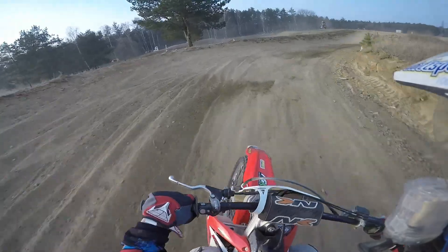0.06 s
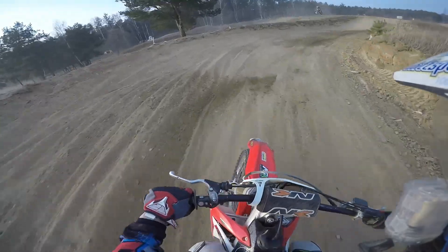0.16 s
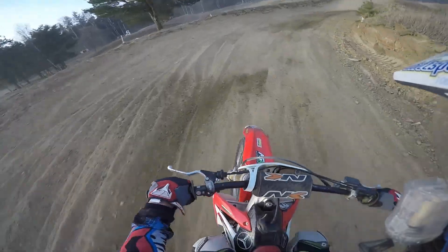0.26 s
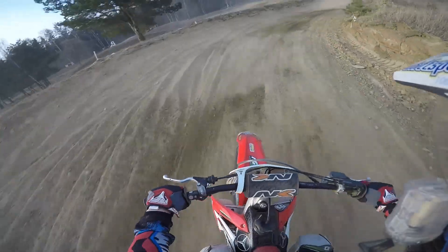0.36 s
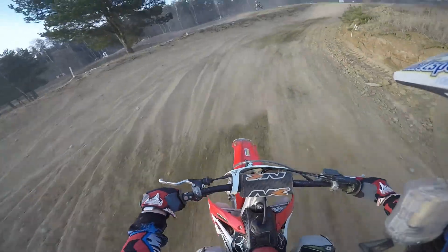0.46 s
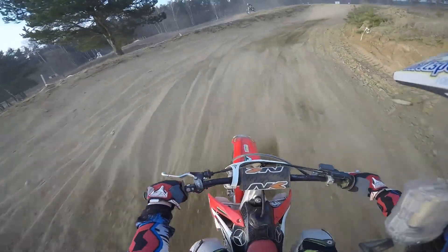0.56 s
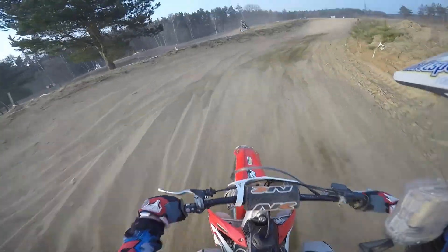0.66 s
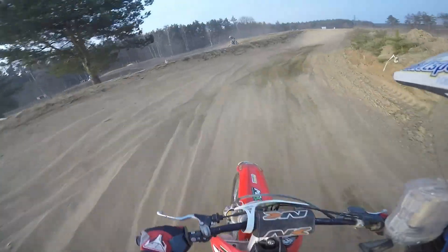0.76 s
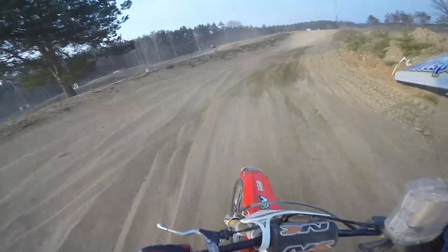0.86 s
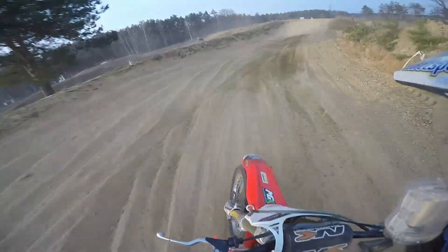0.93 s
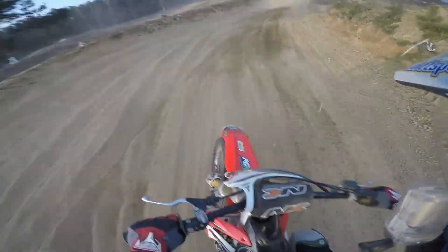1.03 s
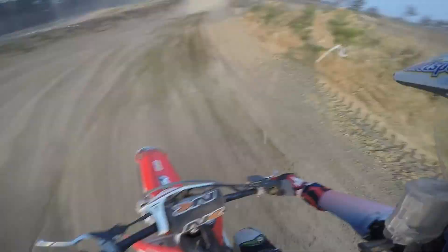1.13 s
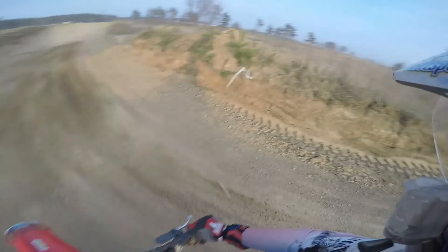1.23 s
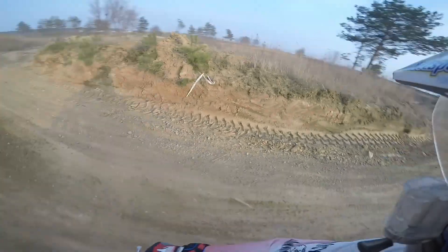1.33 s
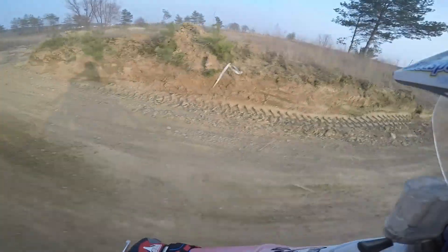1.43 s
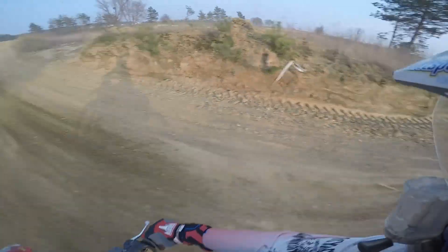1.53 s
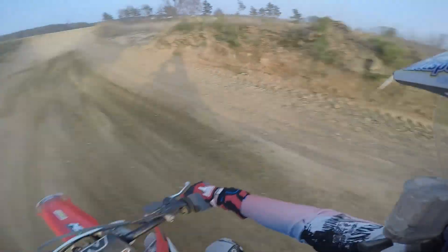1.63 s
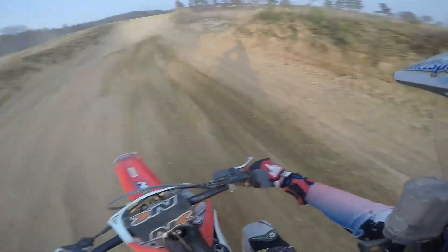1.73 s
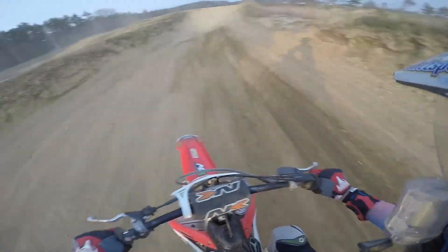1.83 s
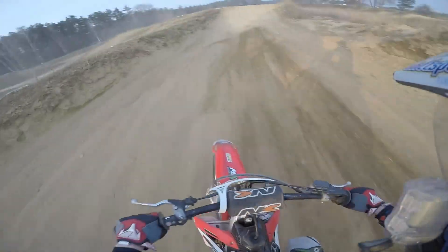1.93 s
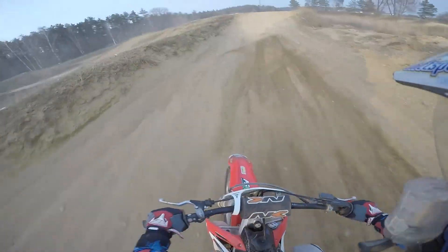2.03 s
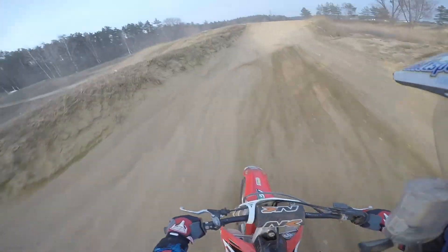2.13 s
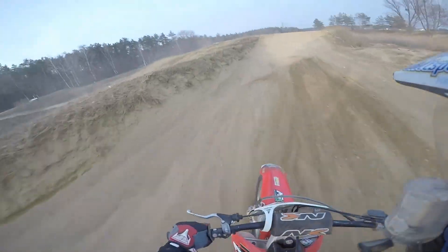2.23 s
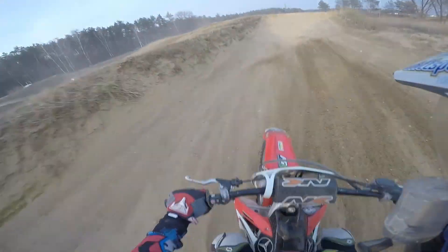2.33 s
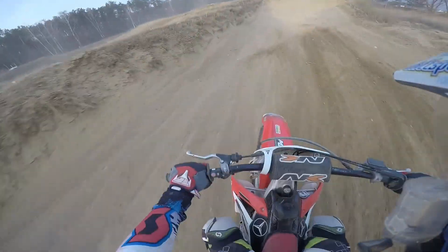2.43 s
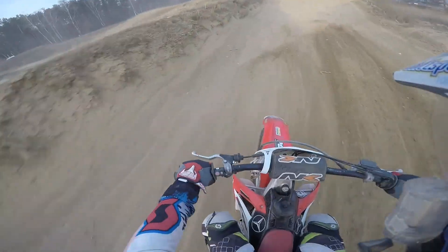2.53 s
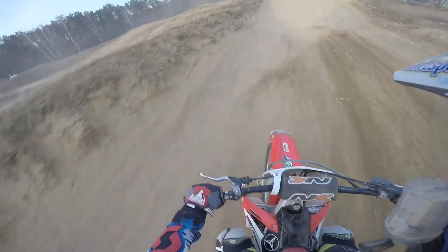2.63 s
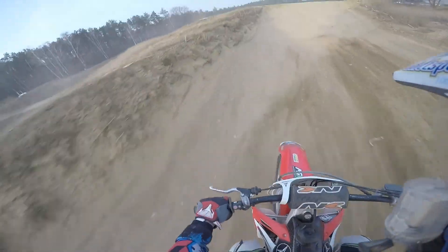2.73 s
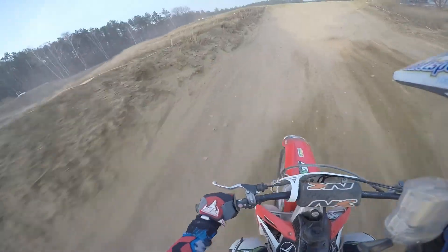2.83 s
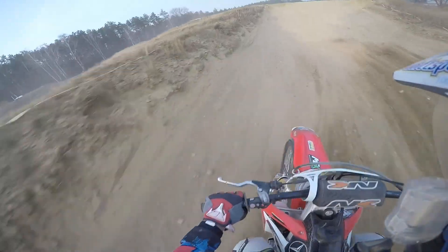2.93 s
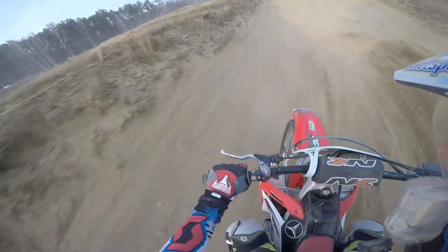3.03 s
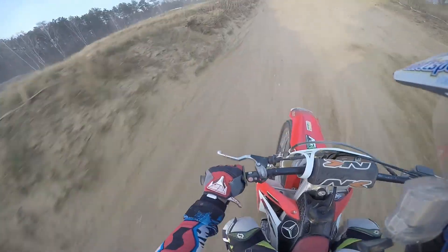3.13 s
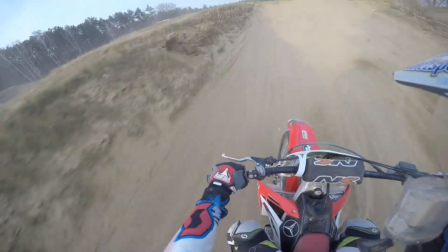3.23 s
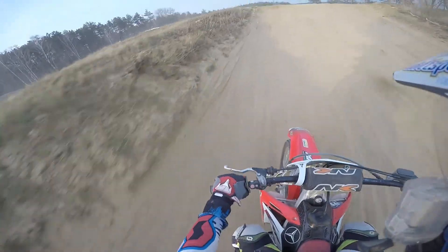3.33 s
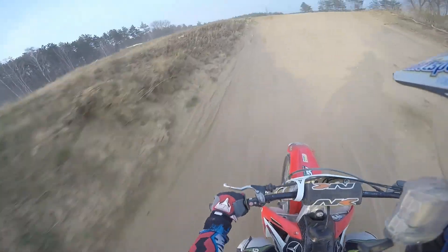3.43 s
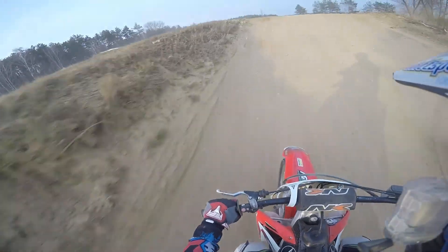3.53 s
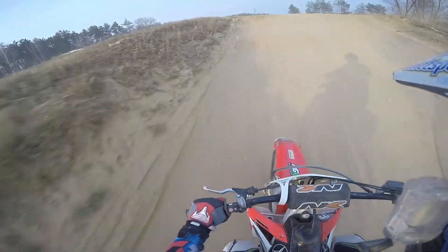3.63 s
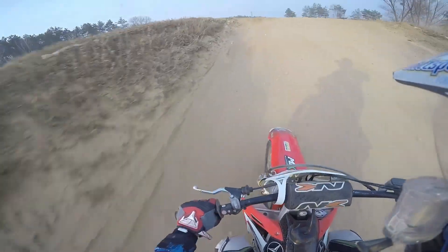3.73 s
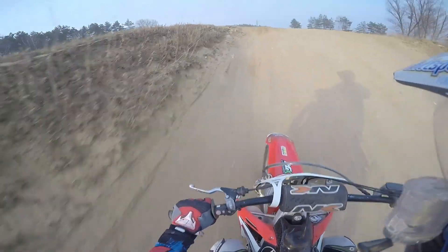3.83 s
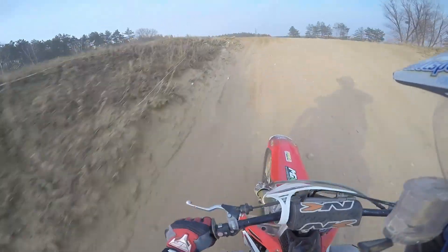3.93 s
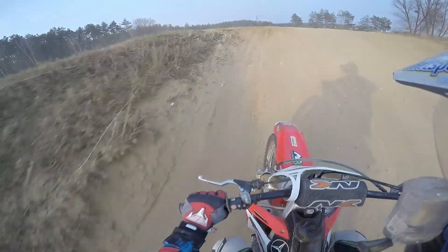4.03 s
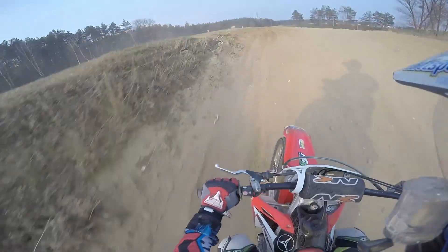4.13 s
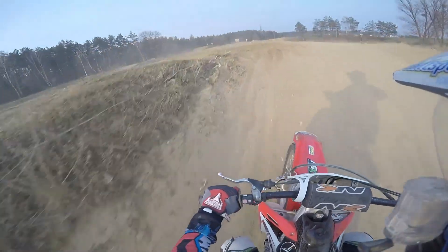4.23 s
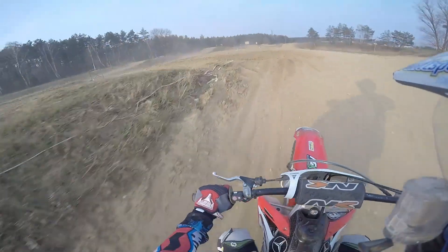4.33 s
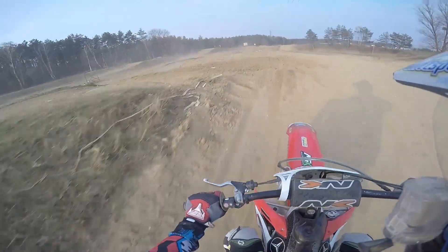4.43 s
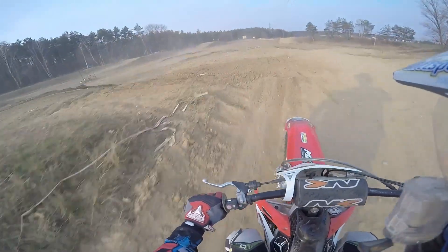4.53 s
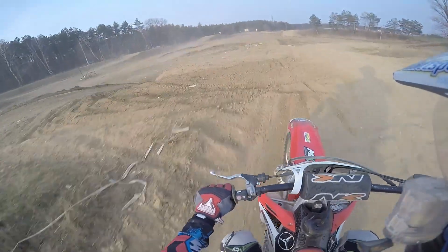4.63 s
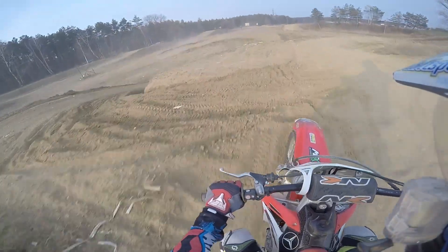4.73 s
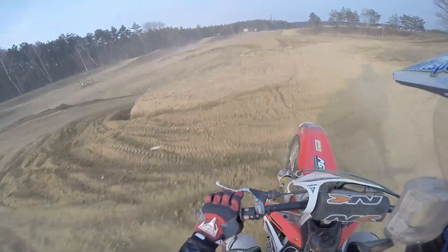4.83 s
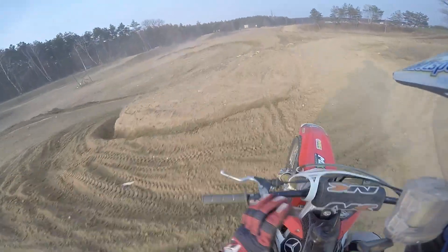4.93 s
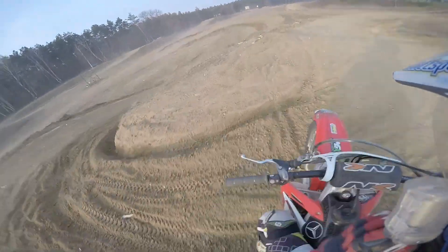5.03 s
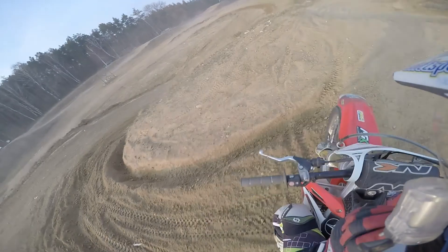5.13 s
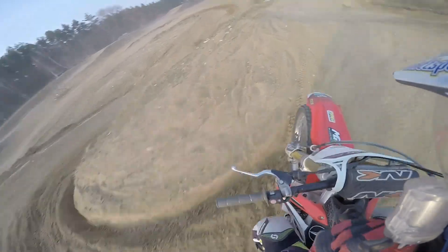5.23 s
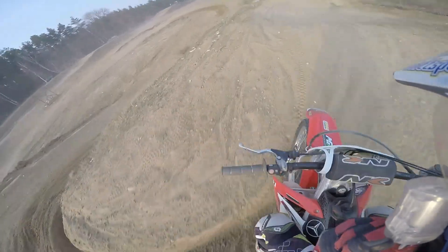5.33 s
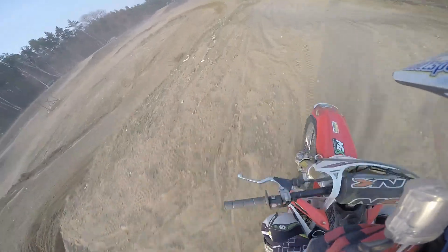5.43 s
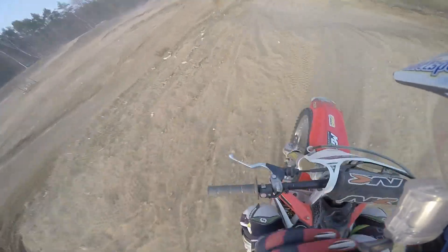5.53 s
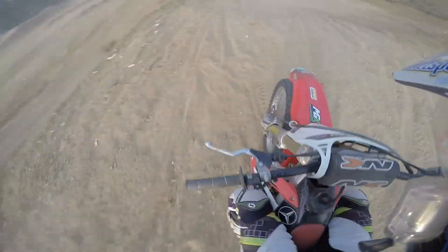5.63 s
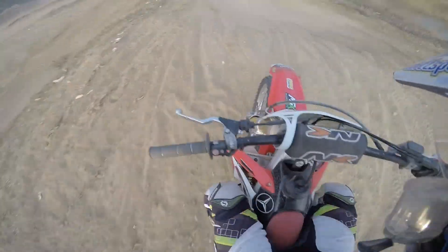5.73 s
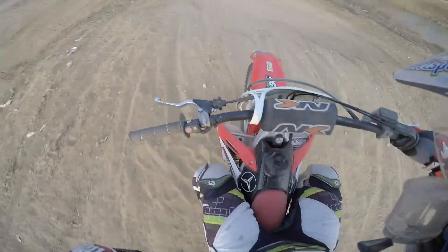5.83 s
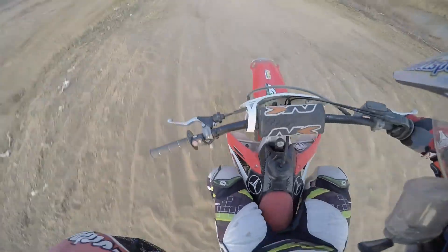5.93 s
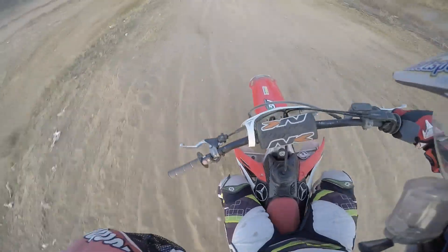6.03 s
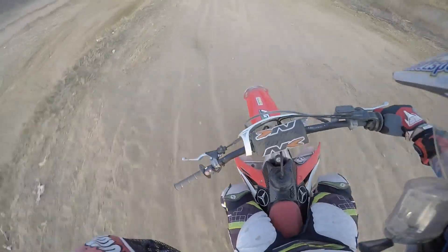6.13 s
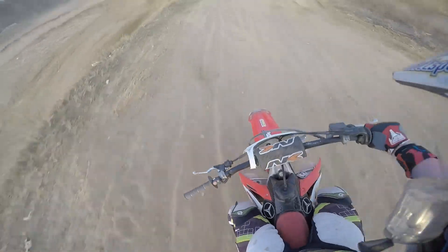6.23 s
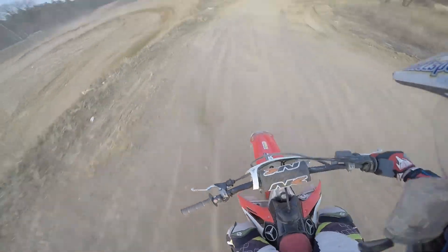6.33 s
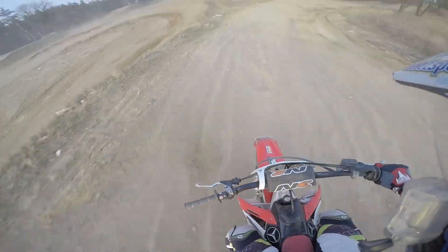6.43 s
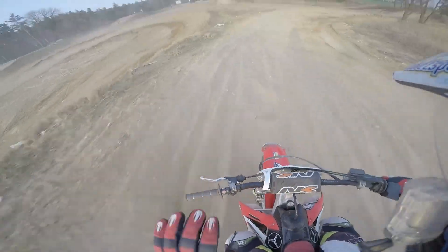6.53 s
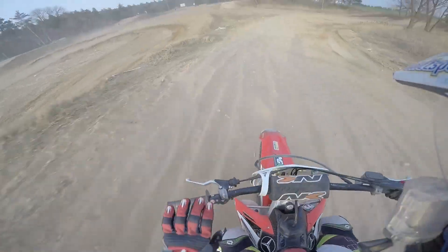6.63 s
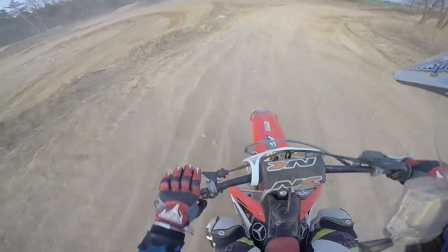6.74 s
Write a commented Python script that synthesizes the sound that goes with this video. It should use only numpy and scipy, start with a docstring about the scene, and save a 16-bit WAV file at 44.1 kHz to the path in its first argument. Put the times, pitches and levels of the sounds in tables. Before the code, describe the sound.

A single-cylinder four-stroke dirt bike runs at low revs on an outdoor dirt track, heard from the rider's helmet. The pipe throbs, gears and chain whirr, valves tick and tyres scrub softly. A strong, barking throttle blip comes at 0.1 s, then more at about 0.4, 0.8, 1.3, 1.5, 1.9 and 2.2 s, each rising quickly and sagging. Deep wind flutter swells around 1 s. Blips continue from 2.6 to 4.6 s, with dry chain slaps, the clearest near 2.5 and 3.95 s, and a buffet at 4.1 s. Revs then fall lower; the brake moans faintly at 4.8 s and chirps very high at 5.1 s, with a low thud at 5.2 s. Around 5.7 s three rapid, hard plastic clacks overload the microphone and leave a low hum. The engine sinks almost away, then partly returns from 6.05 s, blipping at 6.3 and 6.5 s.

```python
"""The throb and whirr of a dirt bike at low revs, heard from the rider's helmet, and soon the first of many blips.
The single-cylinder four-stroke sounds at each firing: a pipe puff, an airbox honk and a rasping burst of gas.
Filtered noise makes the whirr of gears and chain, the scrub of the tyres and the wind that rocks the helmet.
Damped modes make the chain slaps, the jolted camera mount and hard knocks on the camera that overload its microphone.
The brake moans on a wavering tone and squeaks in short chirps."""
import sys
import numpy as np
from scipy import signal
from scipy.fft import rfft, irfft, next_fast_len
from scipy.io import wavfile
from scipy.ndimage import uniform_filter1d, map_coordinates

SR = 44100
rng = np.random.default_rng(int(sys.argv[2]) if len(sys.argv) > 2 else 0)


def wav_record(signal):
    """Record a signal, one row per channel, as 16-bit PCM in the file named by sys.argv[1]."""
    frames = np.transpose(np.atleast_2d(signal))
    bounded = np.clip(frames, -1, 1)
    # unit amplitude maps onto the largest positive 16-bit level
    quanta = np.round(bounded * 32767).astype(np.int16)
    wavfile.write(sys.argv[1], SR, quanta)


N = 298557


def amp(db):
    """Decibels to gain."""
    return 10 ** (np.asarray(db) / 20)


def unit(x):
    """Scaled to rms 1."""
    return x / np.sqrt(np.mean(x ** 2, axis=-1, keepdims=True) + 1e-20)


def clock(length):
    """Sample times over a length in seconds."""
    return np.arange(round(length * SR)) / SR


def curves(rows, times):
    """Each column of a table, read at the given times."""
    s, *cols = np.transpose(rows)
    return [np.interp(times, s, c) for c in cols]


def wobble(rate):
    """A smooth random curve, rate knots a second."""
    return map_coordinates(rng.standard_normal(int(N * rate / SR) + 4), [np.arange(N) * rate / SR])


def colour(points):
    """The response through (Hz, dB) points on a log axis."""
    hz, db = np.transpose(points)
    return lambda f: amp(np.interp(np.log(f + 1), np.log(hz), db))


def resonator(peaks):
    """The causal response of (Hz, width, dB) resonances."""
    return lambda f: sum((-1) ** k * amp(db) * 1j * f * w / (c * c - f * f + 1j * f * w) for k, (c, w, db) in enumerate(peaks))


def filtered(x, response):
    """x through a response, scaled so that white noise keeps its power."""
    size = next_fast_len(N + SR // 2)
    gain = response(np.fft.rfftfreq(size, 1 / SR))
    return irfft(rfft(x, size) * gain / np.sqrt(np.mean(abs(gain) ** 2)), size)[:N]


def placed(times, sounds):
    """One row of sound starting at each time."""
    index = np.round(np.abs(times) * SR).astype(int)[:, None] + np.arange(sounds.shape[1])
    return np.bincount(index.ravel(), sounds.ravel(), N)[:N]


def ring(modes, t):
    """A sum of damped modes; neighbours swing in opposite directions."""
    return sum((-1) ** k * amp(db - 60 * t / t60) * np.sin(2 * np.pi * hz * t) for k, (hz, db, t60) in enumerate(modes))


def gas_bursts(times, levels_db, rise, life, tail_db, tail_life, scatter_db):
    """A burst of turbulence at each time: a head and a weaker tail."""
    t = clock(.04)
    shape = (1 - np.exp(-t / rise)) ** 2 * (np.exp(-t / life) + amp(tail_db) * np.exp(-t / tail_life))
    sizes = amp(levels_db + scatter_db * rng.standard_normal(len(times)))
    return placed(times, sizes[:, None] * unit(shape * rng.standard_normal((len(times), len(t)))))


def envelope(t, full, end, rise, fall):
    """Attack and decay: a linear rise to 1 by full, a hold until end, then exponential decay."""
    attack = np.clip((t - full) / rise + 1, 0, 1)
    decay = np.exp(-np.maximum(t - end, 0) / fall)
    return attack * decay


# Steady buffeting of the helmet: (time [s], relative level [dB])
BREEZE = [(0, -30), (4.7, -29), (5.0, -29.5), (5.9, -28), (6.12, -39.5), (6.77, -32)]
# Gusts and bumps: (time [s], held [s], relative level [dB])
GUSTS = [(0.78, 0.022, -24), (0.94, 0.067, -10.5), (1.14, 0.1, -20), (2.52, 0.02, -23), (3.72, 0.24, -23.5),
         (4.1, 0.022, -12.5), (4.22, 0.08, -20), (4.48, 0.015, -19.5), (5.171, 0.053, -10),
         (5.39, 0.19, -21)]
GUST_RISE_S, GUST_FALL_S = 0.055, 0.045


def buffeting(t):
    """Addition of power: gusts and bumps add to the breeze as incoherent sources; returns dB."""
    power = amp(curves(BREEZE, t)[0]) ** 2
    for s, held, db in GUSTS:
        gust = amp(db) * envelope(t, s, s + held, GUST_RISE_S, GUST_FALL_S)
        power = power + gust ** 2
    return 10 * np.log10(power)


# Spectrum of the deep flutter: (frequency [Hz], relative level [dB])
FLUTTER_SPECTRUM = [(10, -20), (20, -9.5), (27, 8.5), (34, -0.5), (44, -29), (70, -24), (120, -40),
                    (300, -50), (1000, -103)]


def wind(t, rush_db=-41):
    """Turbulent pressure: air and bumps rock the helmet with a deep flutter, over a low rush."""
    buffet_db = buffeting(t)
    flutter = filtered(rng.standard_normal(N), colour(FLUTTER_SPECTRUM))
    # dividing by the running rms over 0.1 s leaves the swells to the buffeting
    swell = np.sqrt(abs(uniform_filter1d(flutter ** 2, size=SR // 10)))
    rush_spectrum = colour([(25, -19), (55, -12.0), (95, -11), (170, -20.5), (400, -44), (1000, -70)])
    rush = filtered(rng.standard_normal(N), rush_spectrum)
    # the rush follows the buffeting only weakly
    rush_gain = amp(rush_db + 0.32 * (buffet_db + 34))
    return amp(buffet_db + 1.5) * flutter / swell + rush_gain * rush


# The engine and tyres drop from the first knock and partly recover: (time [s], gain [dB])
DIP = [(5.67, -0.5), (5.75, -15), (5.85, -20.5), (6.02, -20), (6.045, -12.5), (6.4, -8.5), (6.62, -3)]


def dip_db(t):
    """Attenuation: the gain in dB shared by engine and tyres."""
    return curves(DIP, t)[0]


def tyres(t, level_db=-49):
    """Rolling contact noise: knobbly tyres on packed dirt give a soft, uneven scrub."""
    spectrum = colour([(100, -12), (300, -3), (600, 0), (900, -5), (2000, -24), (6000, -50)])
    scrub = filtered(rng.standard_normal(N), spectrum)
    return amp(level_db + dip_db(t) + 1.5 * wobble(14)) * scrub


# Chain slapping its guide: (time [s], relative peak level [dB])
SLAPS = [(0.307, -22), (0.687, -19), (1.139, -22.5), (2.503, -18), (3.279, -21.5), (3.421, -23),
         (3.951, -16), (4.178, -21), (4.912, -31), (5.178, -24.5), (6.023, -37)]
# Damped modes of the guide: (frequency [Hz], relative level [dB], 60 dB decay time [s])
GUIDE_MODES = [(840, 5.5, 0.014), (1054, 10.5, 0.043), (1237, 7, 0.062), (1290, 1, 0.034), (1600, 4, 0.064),
               (2470, -3, 0.06)]


def chain():
    """Impact excitation: the slack chain rattles on its guide, whose modes ring to the noise of the links."""
    t = clock(.06)
    links = amp(-60 * t / 0.032) * rng.standard_normal((len(SLAPS), len(t)))
    hits = signal.fftconvolve(links, ring(GUIDE_MODES, t)[None], axes=1)
    hits = hits / abs(hits).max(axis=1, keepdims=True)
    times, db = np.transpose(SLAPS)
    return placed(times, amp(db - 1.0)[:, None] * hits)


# Moaning of the brake disc: (time [s], relative level [dB])
MOAN = [(4.75, -75), (4.78, -42), (4.85, -38), (4.89, -55), (4.92, -42), (4.95, -45), (4.98, -80)]


def moan(t, hz=1250):
    """Sustained friction vibration: the dragging pad keeps the disc singing on one unsteady note."""
    level_db, = curves(MOAN, t)
    tone = unit(np.sin(2 * np.pi * hz * t + 1.0 * wobble(110)))  # phase wanders by about 1 rad
    return amp(level_db + 3.1 * wobble(60)) * tone


# Brake squeaks: (time [s], peak level of the envelope [dB])
SQUEAKS = [(5.12, -39), (5.137, -30.5), (5.155, -37), (5.171, -35), (5.33, -39), (5.6, -40), (5.616, -33),
           (5.64, -38)]


def brake(hz=9850, life=0.0021):
    """Transient friction vibration: the pad catches the disc in short, very high chirps."""
    t = clock(.04)
    times, db = np.transpose(SQUEAKS)
    pitch = hz * (1 + 0.0044 * rng.standard_normal((len(times), 1)))
    swell = t / life * np.exp(1 - t / life)  # peaks at 1 after one life
    return placed(times, amp(db)[:, None] * swell * np.sin(2 * np.pi * pitch * t))


# Jolts of the camera mount: (time [s], ring level [dB], thud level [dB])
JOLTS = [(5.184, -13, -12), (5.678, -8, -5.5)]


def mount(hz=81.4):
    """Mass on a spring: a jolt gives a short thud and leaves the camera humming on its mount."""
    t = clock(.9)
    hum = ring([(hz, 0, .68), (185, -21, .25)], t)
    thud = ring([(hz, 0, .15), (150, -8, .07)], t)
    hits = [amp(ring_db) * hum + amp(thud_db) * thud for _, ring_db, thud_db in JOLTS]
    return placed(np.array(JOLTS)[:, 0], np.array(hits))


# Hard knocks on the camera: (time [s], gain [dB], extra gain of modes above 2 kHz [dB], crack level [dB])
KNOCKS = [(5.6742, 0.5, -13, -11), (5.6867, 3.5, 4, -4), (5.7137, 0, -5.5, -28)]
# Damped modes of the camera case: (frequency [Hz], relative level [dB], 60 dB decay time [s])
CAMERA_CASE_MODES = [(446, -19.5, 0.056), (645, -12.5, 0.014), (906, -5, 0.024), (1035, -2.5, 0.012),
                     (1290, -5, 0.018), (1507, -10, 0.028), (2245, -0.5, 0.016), (2610, -8.5, 0.013),
                     (3150, -8.5, 0.011), (5080, -31, 0.035), (6470, -30, 0.024), (7200, -25.5, 0.024)]


def knocks():
    """Modal excitation: plastic clacks three times on the case; the hardest blow wakes its upper modes."""
    t = clock(.08)
    lowpass = signal.butter(2, 6000, fs=SR)
    hits = []
    for _, db, upper_db, crack_db in KNOCKS:
        modes = [(hz, level + upper_db * (hz > 2000), t60) for hz, level, t60 in CAMERA_CASE_MODES]
        crack = amp(crack_db - 60 * t / 0.011) * rng.standard_normal(len(t))
        hits.append(amp(db) * (ring(modes, t) + signal.lfilter(*lowpass, crack)))
    return placed(np.array(KNOCKS)[:, 0], np.array(hits))


# Twists of the throttle, each starting on a firing: (time [s], held [s], rate reached [firings/s],
# coasting time constant [s], airbox honk level [dB], bark level [dB]), levels relative
BLIPS = [(0.099, 0.065, 44.0, 0.32, -21.0, -16.0), (0.442, 0.068, 30.9, 0.25, -25.5, -24.0),
         (0.818, 0.058, 39.3, 0.22, -21.5, -23.0), (1.298, 0.059, 38.3, 0.16, -23.0, -24.0),
         (1.5, 0.074, 35.9, 0.36, -26.0, -25.0), (1.894, 0.078, 38.9, 0.54, -24.0, -22.5),
         (2.171, 0.074, 32.9, 0.58, -33.5, -34.5), (2.614, 0.06, 40.6, 0.29, -21.5, -22.5),
         (2.888, 0.07, 37.5, 0.31, -21.0, -18.5), (3.078, 0.071, 35.9, 0.34, -30.0, -34.5),
         (3.514, 0.064, 41.1, 0.23, -22.0, -20.5), (3.854, 0.051, 40.0, 0.12, -26.5, -25.5),
         (4.091, 0.092, 36.5, 0.3, -24.0, -21.0), (4.598, 0.012, 32.7, 0.23, -24.5, -23.0),
         (5.052, 0.02, 21.2, 0.35, -28.0, -36.0), (5.098, 0.022, 26.8, 0.12, -25.0, -19.0),
         (5.388, 0.17, 25.3, 0.3, -30.0, -27.5), (5.591, 0.037, 31.3, 0.19, -28.0, -24.0),
         (6.043, 0.07, 31.7, 0.14, -31.0, -28.5), (6.284, 0.034, 32.1, 0.21, -28.0, -26.0),
         (6.512, 0.049, 34.9, 0.28, -27.0, -23.5)]
# flywheel rate at the start, and where it would settle when coasting [firings/s]
START_RATE, IDLE_RATE = 33.68, 21.76
# how long before a blip the revs begin to climb, unless the last blip is still held
RUN_UP_S = 0.0925


def revs(t):
    """Flywheel inertia: each blip spins it up, then it coasts exponentially; returns firings per second."""
    def coast(now, since, rate, slowness):
        return IDLE_RATE + (rate - IDLE_RATE) * np.exp(-np.maximum(now - since, 0) / slowness)

    last = (0, START_RATE, np.inf)  # infinite time constant: steady until the first run-up
    rate = coast(t, *last)
    for s, held, reached, slowness, _, _ in BLIPS:
        begin, end = max(s - RUN_UP_S, last[0]), s + held
        climb = np.interp(t, [begin, end], [coast(begin, *last), reached])
        last = (end, reached, slowness)
        rate = np.where(t < begin, rate, np.where(t < end, climb, coast(t, *last)))
    return rate


def crank(t):
    """Phase as the integral of rate: engine cycles turned, with a firing midway through each cycle."""
    cycles = np.cumsum(revs(t)) / SR
    starts = np.array(BLIPS)[:, 0]
    turned = np.interp(starts, t, cycles)
    whole = np.cumsum(np.round(np.diff(turned, prepend=0)))
    # shift the phase gradually so that every blip starts on a firing
    cycles = cycles + np.interp(t, starts, whole + .5 - turned)
    return cycles - np.round(cycles[0])


# Pull on the chain, as the relative level of its whirr: (time [s], level [dB])
PULL = [(0, -32), (0.55, -33), (0.8, -26), (0.98, -27), (1.05, -35.5), (1.25, -33), (1.4, -28.5),
        (1.75, -32.5), (2.55, -33), (2.85, -32), (3.1, -29), (3.45, -34), (4.15, -31), (4.5, -35),
        (5.35, -38), (5.6, -35.5)]
# linear opening time, share of the hold by which it is wide open, and closing time constant
OPEN_S, WIDE_SHARE, CLOSE_S = 0.053, 0.19, 0.044
# the bark lags the honk: its build-up time, and the share of the hold by which it peaks
BUILD_S, BARK_PEAK_SHARE = 0.085, 0.5
# relative levels with the throttle shut at the cruising rate [firings/s]
CRUISE_RATE, PUFF_DB, HONK_DB, BARK_DB = 34.8, -34.5, -37, -35.5
# their rise for each further firing per second [dB]
PUFF_DB_PER_RATE, HONK_DB_PER_RATE, BARK_DB_PER_RATE = 0.26, 0.4, 0.16
# what an open throttle adds to the whirr and to the puff
WHIRR_OPEN_DB, PUFF_OPEN_DB = 2, -0.9


def load(times):
    """Engine load: puff, honk, bark and whirr levels in dB follow speed, throttle and chain pull."""
    t = np.arange(0, N, SR // 1000) / SR  # a grid of about 1 ms
    faster = revs(t) - CRUISE_RATE
    shut_honk = HONK_DB + HONK_DB_PER_RATE * faster
    shut_bark = BARK_DB + BARK_DB_PER_RATE * faster
    s, held, _, _, honk_db, bark_db = np.array(BLIPS).T[:, :, None]  # one row per blip
    opening = envelope(t, s + WIDE_SHARE * held, s + held, OPEN_S, CLOSE_S)
    building = envelope(t, s + BARK_PEAK_SHARE * held, s + held, BUILD_S, CLOSE_S)
    throttle = opening.max(axis=0)
    puff = PUFF_DB + PUFF_DB_PER_RATE * faster + PUFF_OPEN_DB * throttle
    honk = shut_honk + (opening * (honk_db - shut_honk)).max(axis=0)
    rasp = shut_bark + (building * (bark_db - shut_bark)).max(axis=0)
    whirr = curves(PULL, t)[0] + WHIRR_OPEN_DB * throttle
    dip = dip_db(t)
    return [np.interp(times, t, db + dip) for db in (puff, honk, rasp, whirr)]


def sprocket(t, hz=3400, width_hz=750):
    """Resonant contact noise: the chain sizzles on the sprocket, rising faster than the whirr as it tightens."""
    whirr_db = load(t)[3]
    sizzle = filtered(rng.standard_normal(N), lambda f: resonator([(hz, width_hz, 0)])(f) ** 2)
    tension_db = 1.9 * (np.minimum(whirr_db, -26) + 31.5)
    return amp(whirr_db - 12 + tension_db) * sizzle


# Spectrum of gears and chain: (frequency [Hz], relative power density [dB per Hz])
WHIRR_SPECTRUM = [(210, -53), (350, -11), (445, -11.5), (719, -5), (899, -8), (1260, -5.5), (1410, -4),
                  (1570, -3), (2130, -9), (2310, 1), (3500, -8.5), (4820, -15), (9590, -25.5), (14800, -40),
                  (16000, -59)]


def gears(t, cycles):
    """Modulated mesh noise: gears and chain whirr, pulsing with the crank."""
    whirr_db = load(t)[3]
    uneven_db = 1.1 * wobble(130) + 1.2 * np.sin(4 * np.pi * cycles)  # two crank turns a cycle
    mesh = amp(whirr_db + uneven_db) * rng.standard_normal(N)
    return amp(-4.5) * filtered(mesh, colour(WHIRR_SPECTRUM))


# Resonances of the engine cases: (frequency [Hz], width [Hz], relative level [dB])
CASE_RESONANCES = [(928, 58, -6.5), (1265, 55, -1.5), (1830, 220, -3), (2370, 250, -5), (2980, 244, -1),
                   (3596, 215, -2), (5210, 45, -7), (6310, 130, -11.5), (9500, 1900, -22)]


def valve_gear(t, cycles):
    """Structural resonance: valve-gear ticks, two a cycle, and a continuous noise ring the cases."""
    ticks = np.interp(np.arange(.2, cycles[-1], .5), cycles, t)
    tick_db = load(ticks)[3] - 13
    clatter = gas_bursts(ticks, tick_db, rise=0.00022, life=0.0024,
                         tail_db=1, tail_life=0.0027, scatter_db=5.0)
    clatter += amp(load(t)[3] - 4.0) * rng.standard_normal(N)
    damping = colour([(300, -4), (900, 3.0), (3700, -4), (4500, -4),
                      (10000, -7.5), (12000, -28), (16000, -26)])
    return filtered(clatter, lambda f: resonator(CASE_RESONANCES)(f) * damping(f))


def throb(t, cycles):
    """Harmonics of a periodic source: the pipe throbs at the firing rate and at crank speed."""
    puff_db = load(t)[0]
    turn = 2 * np.pi * cycles
    at_firing_rate = amp(-4.0) * np.cos(turn)
    at_crank_speed = amp(3.5 + 0.93 * wobble(18)) * np.sin(2 * turn)
    return amp(puff_db) * (at_firing_rate + at_crank_speed)


# Spectrum of the bark: (frequency [Hz], relative power density [dB per Hz])
BARK_SPECTRUM = [(260, -39), (450, -5), (806, -16.5), (1260, -2.5), (1440, -10), (1630, 2), (2130, -5.5),
                 (2470, -2), (3490, -4), (4840, -18), (9630, -22), (11500, -37), (14200, -37), (15300, -62),
                 (16000, -71)]


def bark(firings):
    """Jet turbulence: gas rasps past the valve; under load the combustion adds a hard crack."""
    bark_db = load(firings)[2]
    hard = np.clip((bark_db + 32) / 18, .12, .65)  # share of the crack
    rasp_db = bark_db - 1.5 + 10 * np.log10(1 - hard)
    crack_db = bark_db - 8 + 10 * np.log10(hard)
    rasp = gas_bursts(firings - .0015, rasp_db, rise=0.00059, life=0.017,
                      tail_db=-13, tail_life=0.019, scatter_db=2.5)
    crack = gas_bursts(firings + 0.001401, crack_db, rise=0.00075, life=0.00089,
                       tail_db=-14.0, tail_life=0.0079, scatter_db=1.5)
    return filtered(rasp + crack, colour(BARK_SPECTRUM))


def swings(times, levels_db, hz, life, unsteady):
    """Damped air column: at each time it swings up and dies away, a little off its usual pitch."""
    t = clock(.04)
    chance = rng.standard_normal((len(times), 2))  # scatter of pitch, and of level by 1 dB
    pitch = hz * (1 + unsteady * chance[:, 0])
    swell = (t / life) ** 2 * np.exp(-t / life)
    waves = swell * np.sin(2 * np.pi * pitch[:, None] * t)
    return placed(times, amp(levels_db + chance[:, 1])[:, None] * unit(waves))


def throttle_share(honk_db):
    """Monotonic scaling: the honk level read back as a throttle opening from 0 to 1."""
    return np.clip((honk_db + 41.5) / 17, 0, 1)


# Spectrum of the airbox growl: (frequency [Hz], relative level [dB])
GROWL_SPECTRUM = [(150, -3), (300, 2), (440, -9.5), (600, -4.5), (800, -15.5), (1500, -40.5)]


def airbox(firings):
    """Cavity resonance: the intake gulp rings the airbox as the throttle opens."""
    honk_db = load(firings)[1]
    throttle = throttle_share(honk_db)
    times = firings - .001
    unsteady = .015
    pop = swings(times, honk_db - 0.5 - 12 * throttle, hz=239.1, life=0.0036, unsteady=2 * unsteady)
    honk = swings(times, honk_db - 13 + 8.9 * throttle, hz=260.9, life=0.0041, unsteady=unsteady)
    overtone = swings(times, honk_db - 14.5, hz=448.7, life=0.0042, unsteady=unsteady)
    growl = gas_bursts(times, honk_db - 10.0, rise=0.0017, life=0.022,
                       tail_db=-12, tail_life=0.017, scatter_db=2.5)
    return pop + honk + overtone + filtered(growl, colour(GROWL_SPECTRUM))


def exhaust(firings):
    """Pulsed flow: every firing thumps the pipe with a puff of gas."""
    puff_db, honk_db, _, _ = load(firings)
    # the gas pulse shortens with revs and throttle, so its pitch sags after each blip
    puff_hz = np.minimum(40 + revs(firings) * (2.69 + 2.0 * throttle_share(honk_db)), 175)
    return swings(firings - .002, puff_db - .5, puff_hz, life=.0028, unsteady=.05)


def scene():
    """Superposition: all sources add; the engine fires once in every cycle of two crank turns."""
    t = np.arange(N) / SR
    cycles = crank(t)
    firings = np.interp(np.arange(.5, cycles[-1]), cycles, t)
    surroundings = wind(t) + tyres(t)
    contacts = chain() + moan(t) + brake() + mount() + knocks()
    machinery = sprocket(t) + gears(t, cycles) + valve_gear(t, cycles)
    gas = throb(t, cycles) + bark(firings) + airbox(firings) + exhaust(firings)
    return (surroundings + contacts + machinery + gas)[None]


TOP_HZ = 15400  # the microphone's band limit


def record(dry):
    """Saturation and band limiting: the microphone overloads near full scale and passes nothing above TOP_HZ."""
    clipped = dry / (1 + abs(dry) ** 8) ** (1 / 8)
    passband = np.fft.rfftfreq(N, 1 / SR) < TOP_HZ
    return irfft(rfft(clipped) * passband, N)


dry = scene()
out = record(dry)
wav_record(out)
```